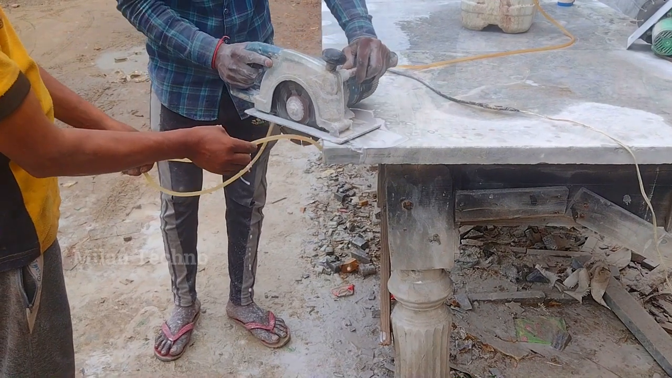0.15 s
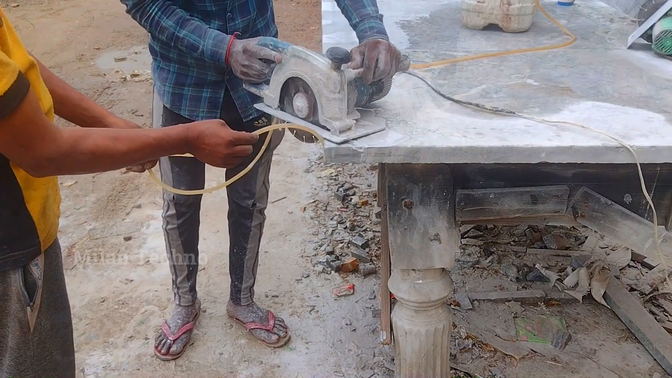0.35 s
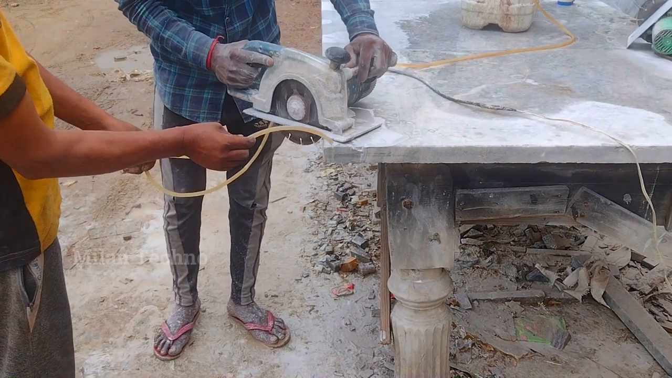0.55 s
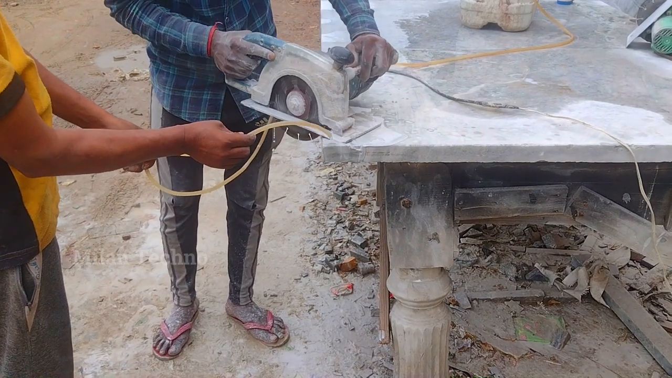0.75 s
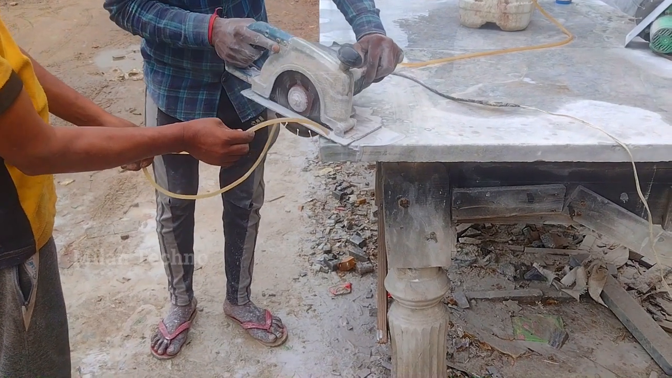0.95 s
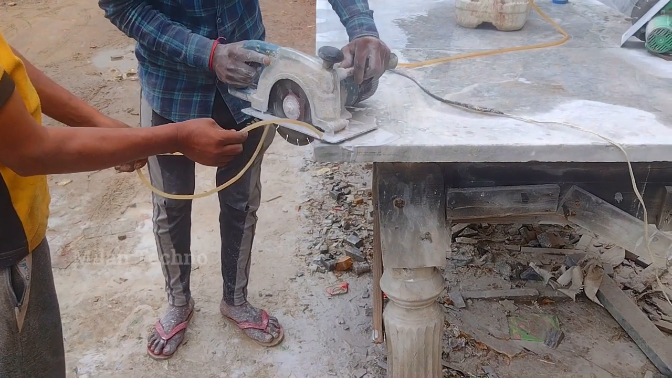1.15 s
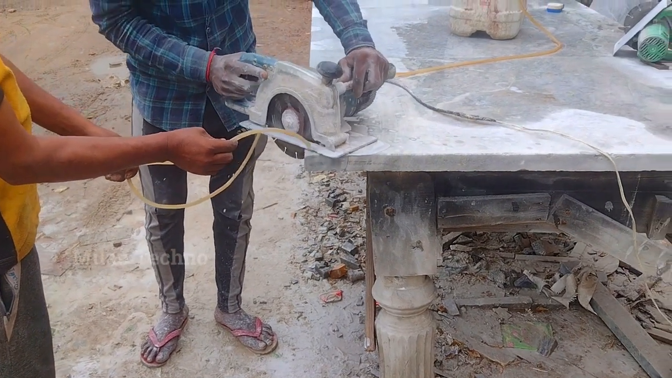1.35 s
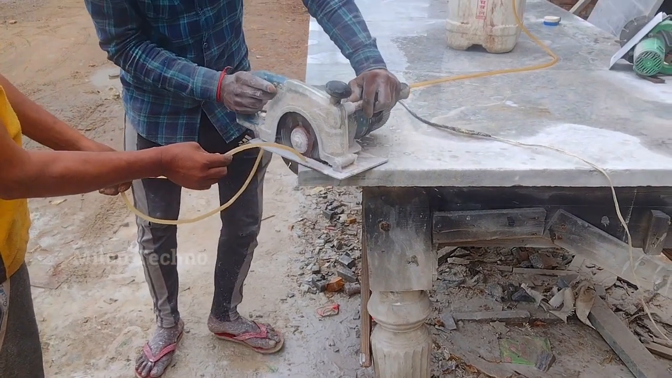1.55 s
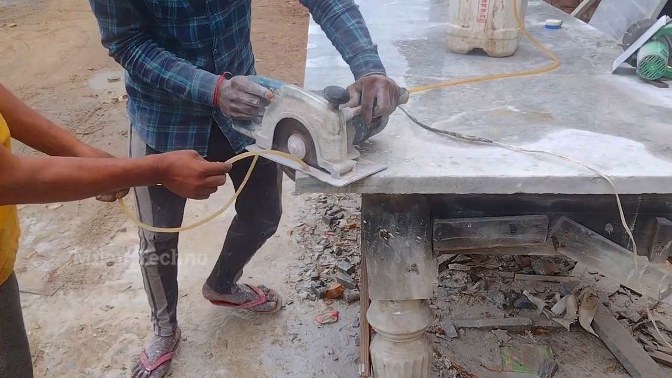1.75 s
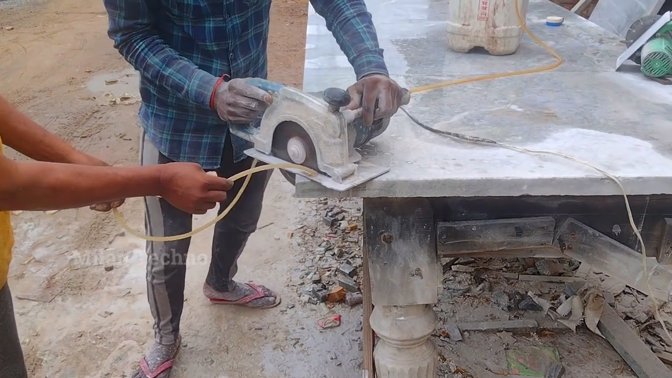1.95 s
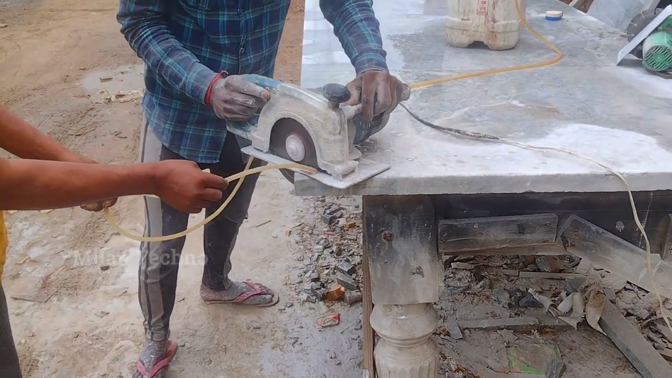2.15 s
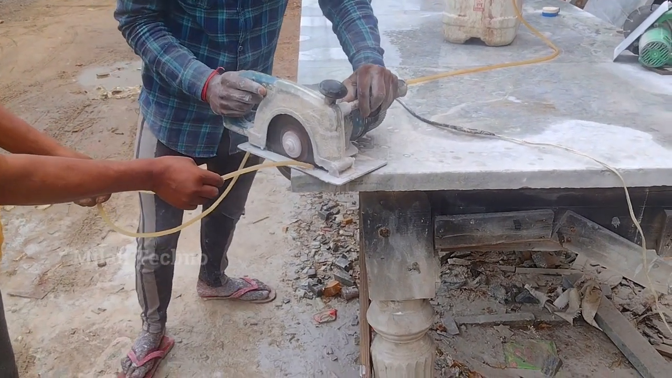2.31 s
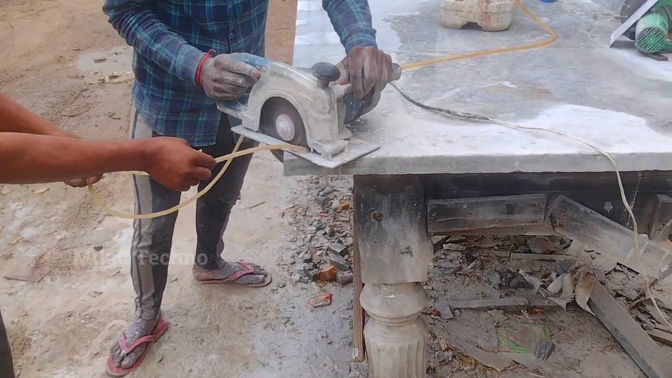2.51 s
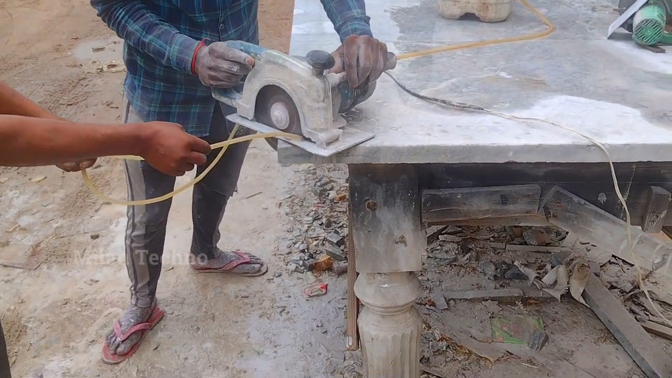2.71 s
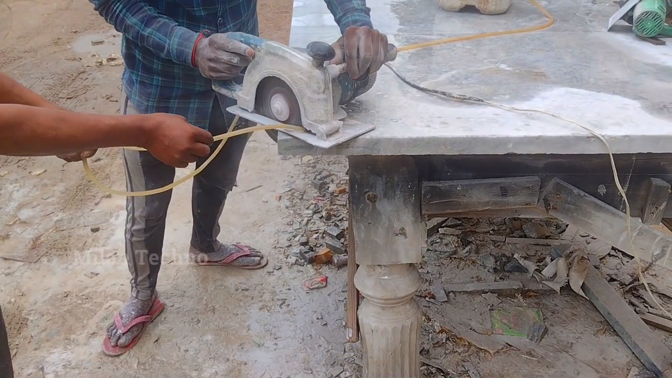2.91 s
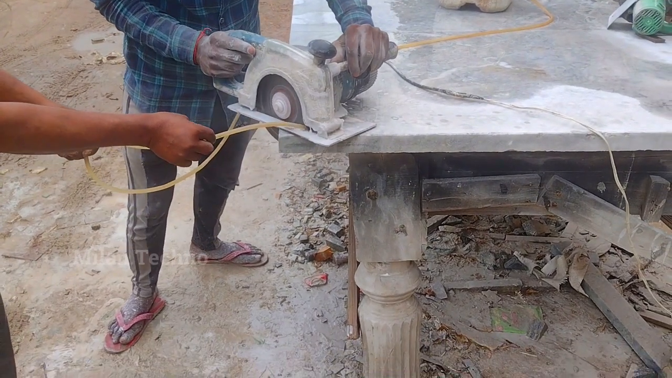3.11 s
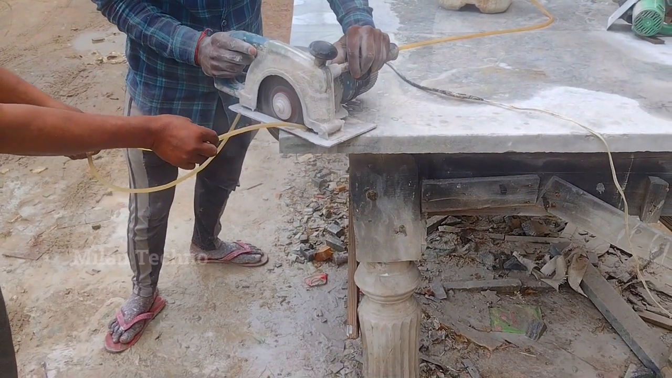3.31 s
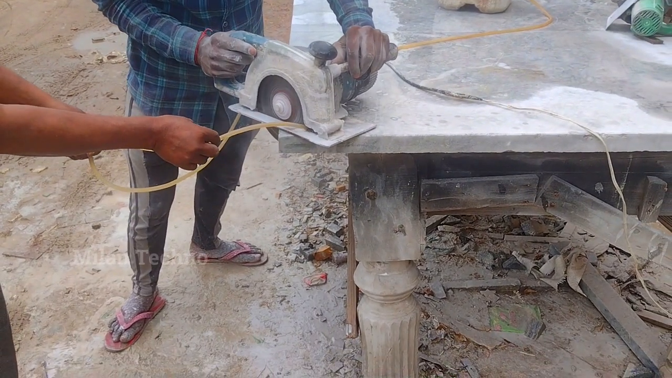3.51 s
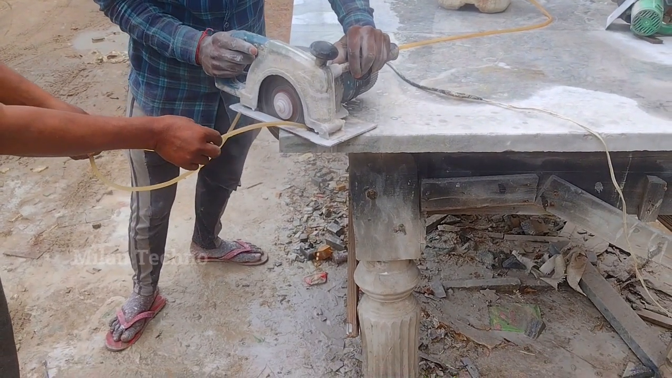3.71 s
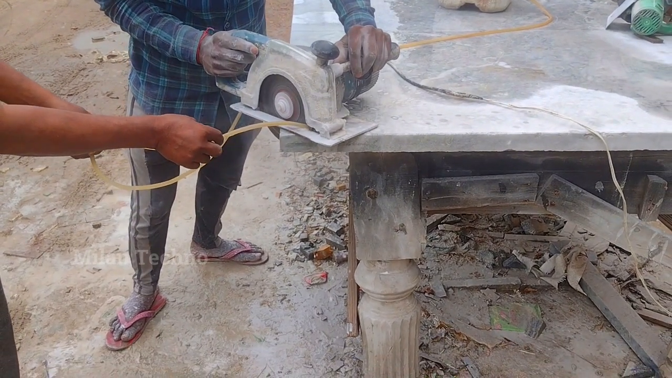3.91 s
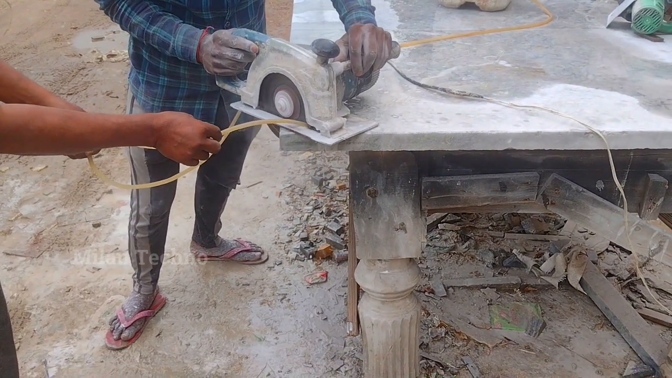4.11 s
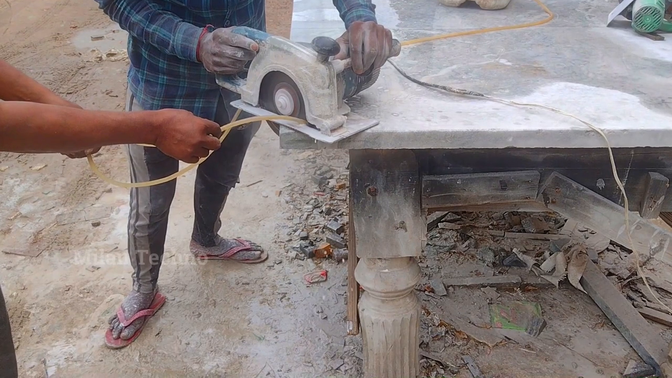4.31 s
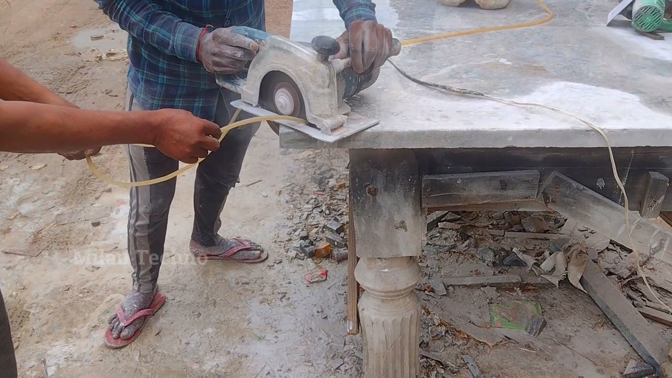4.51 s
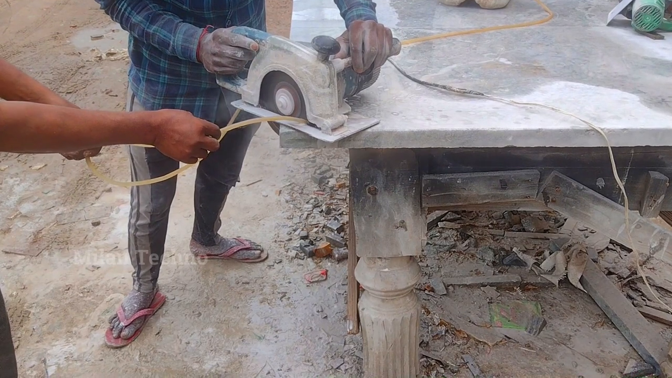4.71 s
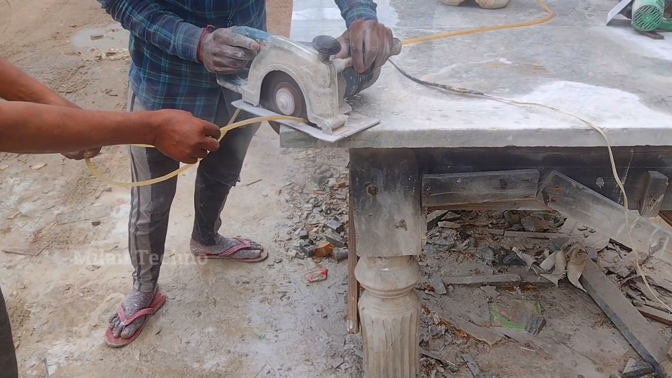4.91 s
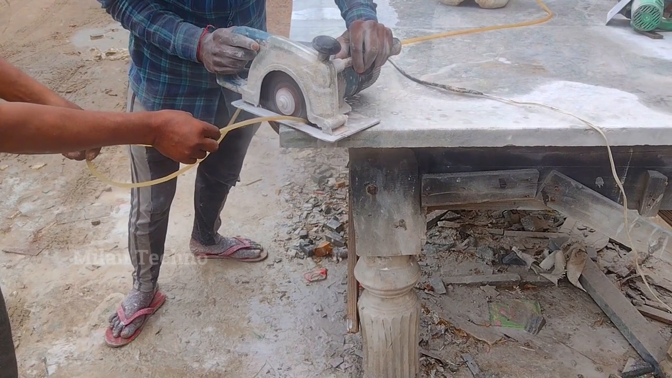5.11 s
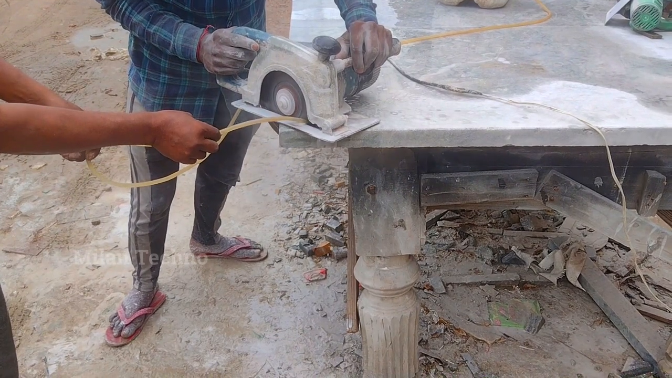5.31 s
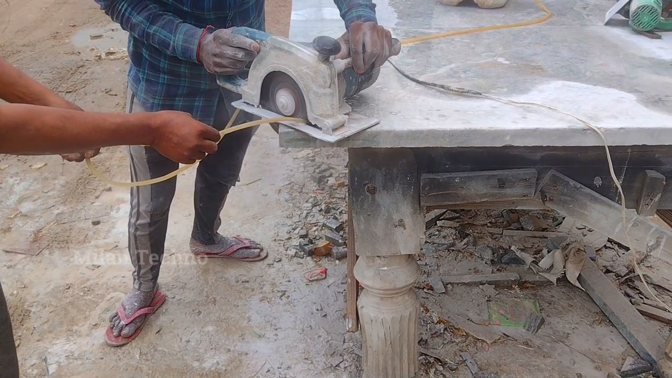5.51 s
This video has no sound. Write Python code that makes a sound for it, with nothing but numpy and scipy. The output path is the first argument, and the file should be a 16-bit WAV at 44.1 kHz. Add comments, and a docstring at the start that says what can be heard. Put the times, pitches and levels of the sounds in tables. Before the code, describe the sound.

Coasting blade hums and chirps faintly, a steel shoe scrapes and knocks on stone, then a handheld saw starts and grinds loudly to the end.

```python
"""Over a low yard rumble a gear hums faintly and chirps as the blade of a handheld wet saw coasts down.
Its steel shoe ticks, scrapes and knocks on a stone slab: bursts of coloured noise and decaying steel tones.
At 1.8 s the motor kicks in with a rush of fan noise, then the diamond blade grinds: a hiss that partly
repeats every turn, coloured by blade and guard, under a whine at multiples of the blade speed."""
import sys
import numpy as np
from scipy import signal
from scipy.fft import rfft, irfft
from scipy.io import wavfile

SR = 44100
rng = np.random.default_rng(int(sys.argv[2]) if len(sys.argv) > 2 else 0)


def pcm_store(signal):
    """Save signal as 16-bit PCM."""
    levels = np.round(np.clip(np.atleast_2d(signal), -1, 1) * 32767)
    wavfile.write(sys.argv[1], SR, levels.astype(np.int16).T)


N = 244755
TIME = np.arange(N) / SR
FREQ = np.maximum(np.arange(N // 2 + 1) * SR / N, 1)
SWITCH_ON_S = 1.791
RUN_TIME = np.maximum(TIME - SWITCH_ON_S, 0)   # seconds since the switch was pressed

# Speed the motor holds against the cut. Each row: time [s], blade speed [turns per s].
HELD_SPEED = [(2.7, 63.6), (3.45, 61), (3.76, 61.3), (4.39, 59.9), (5.18, 61.1), (5.44, 61.9), (5.55, 63.1)]
# The two microphone ports hear the same sound out of step.
# Each row: frequency [Hz], phase by which the left leads [radians].
PORT_LEAD = [(100, 0), (900, .9), (1500, 2.4), (2300, 1.3), (3100, 1.3), (3600, 3.05), (4150, 3.2),
             (4500, 4.5), (4900, 4.4), (5750, 6.3), (6900, 5.6), (7900, 6.7), (8600, 10.8), (9300, 11.3),
             (10300, 15.2), (11600, 14), (14000, 17.6)]
# Short resonances of the shoe and housing.
# Each row: frequency [Hz], width at half the lift [Hz], lift left [dB], lift right [dB].
SHOE_RESONANCES = [(756, 220, 4, 7), (1209, 146, 9.5, 8.5), (1437, 56, 8.5, 5.5), (1677, 120, 11.5, 9),
                   (4100, 52, 8.5, -12), (4370, 62, 9, -18), (4680, 120, 2, 14), (5495, 113, 13.5, -47),
                   (6150, 260, 8, 2), (6680, 120, 8.5, -7), (7260, 51, 13, -17)]
# Stereo tilt of the shoe. Each row: frequency [Hz], left minus right [dB].
SHOE_TILT = [(200, 0), (700, 0), (2400, -1.5), (4400, 8.5), (8000, 4), (15000, -1)]
# Stereo likeness of shoe and yard. Each row: frequency [Hz], left-right coherence [0-1].
SHOE_COHERENCE = [(60, 0.89), (290, 1), (640, 0.86), (1400, 0.22), (3100, 0.23), (7000, 0.12),
                  (15000, 0.21)]
# Bright colour of ticks and scratches. Each row: frequency [Hz], relative level [dB per Hz].
TICK_COLOUR = [(1000, -33), (2500, -12), (3800, -9.5), (4700, 6), (5600, 1.5), (6500, 3.5), (7500, 1.5),
               (8600, -3.5), (11000, -12), (15500, -24)]


def from_db(db):
    """Decibels to gain."""
    return 10 ** (np.asarray(db) / 20)


def rms_one(x):
    """Scale to unit power."""
    return x / np.sqrt(np.mean(x ** 2) + 1e-20)


def in_time(rows):
    """A control curve at every sample."""
    return np.interp(TIME, *np.transpose(rows))


def over_hz(points):
    """A spectrum at every frequency, interpolated along log frequency."""
    hz, value = np.transpose(points)
    return np.interp(np.log(FREQ), np.log(hz), value)


def drift(rate):
    """Slow chance with spread 1: noise at twelve points a cycle, smoothed twice and run in."""
    points_per_s = 12 * max(rate, 1)   # rate in Hz
    count = int(points_per_s * N / SR) + 2
    r = np.exp(-2 * np.pi / 12)
    noise = rng.spawn(1)[0].standard_normal(count + 40)
    slow = signal.lfilter([1], [1, -2 * r, r * r], noise)[40:]
    return rms_one(np.interp(TIME * points_per_s, np.arange(count), slow))


def white():
    """Two unrelated noises."""
    return rng.standard_normal((2, N))


def lifts(resonances):
    """Resonant humps in dB, for left and right."""
    total = 0
    for hz, width, left, right in resonances:
        hump = 1 / (1 + (2 * (FREQ - hz) / width) ** 4)
        total = total + np.array([[left], [right]]) * hump
    return total


def radiate(force, colour_db, likeness, pan):
    """Two unrelated forces ring through a body and reach both ports; the power is kept."""
    a, b = rfft(force)
    alike = np.clip(over_hz(likeness), 0, .99)
    tilt = over_hz(pan) / 2
    pair = np.sqrt(1 + alike) * a + np.sqrt(1 - alike) * b * [[1], [-1]]
    pair[1] *= np.exp(-1j * over_hz(PORT_LEAD))
    gain = rms_one(from_db(colour_db + np.array([tilt, -tilt])))
    # minimum phase: a body rings only after it is pushed
    cepstrum = irfft(np.log(gain), N)
    phase = rfft(2 * cepstrum * (np.arange(N) < N // 2)).imag
    return irfft(pair * gain * np.exp(1j * phase), N) / np.sqrt(2)


def surge(sound, depth_db, rate):
    """As the contact point shifts, each ringing zone of the steel swells and ebbs on its own."""
    # Bands where the steel rings. Each row: low edge [Hz], high edge [Hz].
    ringing_bands = [(4100, 5800), (5400, 6000), (6150, 6900)]
    for low, high in ringing_bands:
        band = signal.butter(1, [low, high], "band", fs=SR, output="sos")
        zone = signal.sosfilt(band, sound)
        sound = sound + zone * (from_db(depth_db * drift(rate)) - 1)
    return sound


def yard_rumble(level_db=-44.5):
    """The open yard is a steady, mostly low noise whose level wavers slightly."""
    # Colour of the yard. Each row: frequency [Hz], relative level [dB per Hz].
    yard_colour = [(25, -1), (60, 2.5), (130, 5.5), (300, -7.5), (450, -2.5), (650, -11), (1200, -13.5),
                   (2300, -12.5), (4400, -19.5), (7000, -26), (10000, -30), (14000, -75)]
    # Stereo tilt of the yard. Each row: frequency [Hz], left minus right [dB].
    yard_tilt = [(50, -0.5), (8000, -0.5)]
    rumble = radiate(white(), over_hz(yard_colour), SHOE_COHERENCE, yard_tilt)
    return from_db(level_db + 0.54 * drift(13)) * rumble


def blade_turns(coast_turns_per_s=53.5, coast_loss_turns_per_s2=6.0, start_turns_per_s=27, spin_up_s=0.21):
    """Angle of the blade in turns: it coasts, spins up, then follows the load and wavers."""
    coasting = coast_turns_per_s - coast_loss_turns_per_s2 * TIME
    held = in_time(HELD_SPEED)
    driven = held + (start_turns_per_s - held) * np.exp(-RUN_TIME / spin_up_s)
    speed = np.where(TIME < SWITCH_ON_S, coasting, driven)
    return np.cumsum(speed * (1 + 0.000793 * drift(7.95))) / SR


def coasting_gear(turns, gear_multiple=12, level_db=-52, fade_db_per_s=10, octave_db=-6):
    """The gear hums faintly, as a tone and its octave, and sinks in pitch while the blade coasts."""
    level = from_db(level_db - fade_db_per_s * TIME + 2.5 * drift(12)) * (TIME < SWITCH_ON_S)
    angle = 2 * np.pi * gear_multiple * turns + .6 * drift(25)
    return level * (np.sin(angle) + from_db(octave_db) * np.sin(2 * angle))


def chirp(turns, centre_hz=7950, sweep_hz=800, level_db=-51.5, gone_s=1.71):
    """A faint falling squeak comes once a turn of the coasting blade, then fades out."""
    within = turns % 1
    hz = centre_hz + sweep_hz * (.5 - within) + 110 * drift(73)
    fade = np.clip((gone_s - TIME) / 0.32, 0, 1)
    pulse = np.sin(np.pi * within) ** 2 * fade
    return from_db(level_db + 2 * drift(19)) * pulse * np.sin(2 * np.pi * np.cumsum(hz) / SR)


def contacts(times, lengths, levels, rise, t60, tail_db, tail_t60):
    """Envelope of contacts: each swells, holds for its length and dies with a weak tail from the yard."""
    power = np.zeros(N)
    age = TIME[:SR]   # each contact is followed for one second
    for s, length, db in zip(times, lengths, levels):
        start = int(s * SR)
        after = np.maximum(age - length, 0)
        body = np.exp(-np.log(1000) * after / t60)
        tail = from_db(tail_db) * np.exp(-np.log(1000) * after / tail_t60)
        swell = 1 - np.exp(-age / rise)
        power[start:start + SR] += (from_db(db) * swell * (body + tail)) ** 2
    return np.sqrt(power)


def slide(grain_db=4.0, judder_db=2.5):
    """Fine grit crunches under the shoe and sets it ringing; its edge scratches or ticks on the stone."""
    # Shoves of the shoe over gritty stone, and two light ticks (at 0.038 and 0.239 s).
    # Each row: start [s], length [s], rasp level [dB], level of the thin edge scratch [dB].
    slide_rows = [(0.038, 0.0036, -39, -41.5), (0.12, 0.094, -46, -48), (0.239, .004, -51, -34.5),
                  (0.819, 0.01, -31, -34), (0.888, 0.02, -35.5, -49), (.96, 0.078, -41, -63),
                  (1.07, 0.074, -33, -47), (1.189, .016, -33.5, -25.5), (1.272, .039, -27, -26),
                  (1.336, .035, -28.5, -31), (1.408, 0.062, -29.5, -32.5), (1.496, 0.11, -27, -46),
                  (1.525, 0.015, -27.5, -37), (1.605, 0.011, -28.5, -30)]
    # Colour of the rasp. Each row: frequency [Hz], relative level [dB per Hz].
    rasp_colour = [(100, -14), (300, -12.5), (520, -17), (720, -8), (1000, -14), (1400, -7), (2000, -8),
                   (3500, -11), (5300, -11.5), (7500, -16), (10000, -18), (15000, -39)]
    times, lengths, rasp_db, scratch_db = np.transpose(slide_rows)
    rasp = contacts(times, lengths, rasp_db, rise=0.0071, t60=0.26, tail_db=-40, tail_t60=.3)
    # the scratch starts almost at once
    scratch = contacts(times, lengths, scratch_db, rise=.0004, t60=0.039, tail_db=-17.0, tail_t60=0.79)
    out = 0
    for push, colour in [(rasp, rasp_colour), (scratch, TICK_COLOUR)]:
        roughness = from_db(grain_db * drift(1693) + judder_db * drift(60.2))
        force = rms_one(white() * roughness) * push
        out = out + radiate(force, over_hz(colour) + lifts(SHOE_RESONANCES), SHOE_COHERENCE, SHOE_TILT)
    return surge(out, depth_db=3.0, rate=20)


def knocks(ring_db=1.5):
    """The slab thuds, the housing clangs, the stone cracks and ticks, and the steel rings on."""
    # The shoe hits the slab. Each row: time [s], thud [dB], clang [dB], tick [dB],
    # sharp crack [dB], length of the contact [s].
    knock_rows = [(.298, -39, -27.5, -25, -32, 0.016), (.313, -19.5, -20.5, -25, -17, .0084),
                  (.614, -43, -24, -23.5, -20, 0.015), (.671, -49, -33.5, -39, -34, 0.0086),
                  (.705, -40.5, -34.5, -43, -45, 0.0065), (1.037, -26, -18.5, -25, -20, 0.0075),
                  (1.123, -26, -25, -30, -4, 0.0059), (1.326, -31, -32.5, -39, -33, 0.01),
                  (1.631, -21, -22.5, -39, 4.5, .005), (1.726, -35, -35, -25, -15, 0.0009),
                  (1.791, -33, -15, -19, 9, 0.0091)]
    # Colours of thud and clang. Each row: frequency [Hz], relative level [dB per Hz].
    thud_colour = [(60, -19), (110, -26), (150, 4), (200, -7), (270, 3.5), (360, -1), (480, -10), (700, -8),
                   (1500, -43)]
    clang_colour = [(250, -31), (500, -16), (720, -2.5), (950, -3.5), (1200, 4), (1450, 1), (1700, -2.5),
                    (2100, -7.5), (2800, -5.5), (4000, -13.5), (8000, -37)]
    # Ringing of blade and shoe. Each row: frequency [Hz], level relative to the clang
    # before the ring trim and chance [dB], time to fall by 60 dB [s].
    steel_modes = [(149.7, -21.5, 0.26), (352, -19.5, 0.25), (496, -18.5, 0.4), (610, -20, 0.44),
                   (696, -18, 0.45), (816, -18, 0.47), (934, -22, 0.5), (1180, -20.5, 0.55),
                   (1186, -6, 0.058), (1470, -7.5, 0.067), (1695, -24, 0.17), (2096, -14.5, 0.19),
                   (3460, -27, 0.3), (4680, -33, .1), (7360, -18, 0.17)]
    times, thud_db, clang_db, tick_db, crack_db, lengths = np.transpose(knock_rows)
    at = (times * SR).astype(int)
    crack = np.zeros((2, N))
    crack[0, at] = from_db(crack_db)   # single-sample blows
    thud = white() * contacts(times, lengths, thud_db, rise=0.0034, t60=0.12, tail_db=-15.5, tail_t60=0.42)
    clang = white() * contacts(times, lengths, clang_db, rise=0.00069, t60=0.059, tail_db=-8, tail_t60=0.24)
    tick = white() * contacts(times, lengths, tick_db, rise=0.00013, t60=0.046, tail_db=-17.5, tail_t60=0.41)
    parts = [(thud, thud_colour), (clang + 2 * crack, clang_colour), (tick + crack, TICK_COLOUR)]
    out = np.zeros((2, N))
    for force, colour in parts:
        out += radiate(force, over_hz(colour) + lifts(SHOE_RESONANCES), SHOE_COHERENCE, SHOE_TILT)
    for hz, db, t60 in steel_modes:
        blows = np.zeros((2, N))
        chance_db = rng.normal(0, 1.7, (len(times), 2)).T
        blows[:, at] = from_db(clang_db + db + ring_db + chance_db)
        # two-pole resonator: every blow starts a decaying sine
        r = np.exp(-np.log(1000) / (t60 * SR))
        w = 2 * np.pi * hz / SR
        out += signal.lfilter([0, np.sin(w)], [1, -2 * r * np.cos(w), r * r], blows + 1e-18)
    return out


def rim_pattern(turns, size=600):
    """The same diamonds meet the stone on every turn; they wear and change slowly."""
    rims = signal.resample(rng.standard_normal((2, size)), size * 8, axis=1)
    place = np.linspace(0, 1, size * 8, endpoint=False)   # position round the rim in turns
    first, second = (np.interp(turns, place, rim, period=1) for rim in rims)
    wear = 2.258 * TIME + .5 * drift(2.2)   # radians, crossfades the two patterns
    return rms_one(first * np.cos(wear) + second * np.sin(wear))


def blade_whine(turns, waver_db=2.5, pan_db=1.5):
    """Gear and rim whine as wavering sines at multiples of the blade speed."""
    # Each row: multiple of the blade speed, relative level [dB].
    whine_tones = [(12, -41), (14, -32.5), (25, -26), (26, -29), (27, -27), (28, -30.5), (29, -27),
                   (33, -36), (37, -32), (45, -34), (50, -33), (52, -32)]
    mean_speed = np.mean(HELD_SPEED, axis=0)[1]
    tones = 0
    for multiple, db in whine_tones:
        port_lag = np.interp(multiple * mean_speed, FREQ, over_hz(PORT_LEAD))
        angle = 2 * np.pi * (multiple * turns + rng.random()) - np.array([[0], [port_lag]])
        level = np.sqrt(2) * from_db(db + waver_db * drift(4.47))
        tones = tones + level * np.sin(angle + 0.28 * drift(11.3))
    return tones * from_db([[pan_db], [-pan_db]])


def saw(turns, repeating=0.38, grit_db=1.5, wobble_db=0.6):
    """The fan rushes at once; grinding and whine take over as the blade bites."""
    # Rush of fan and brushes, and grinding of stone.
    # Each row: frequency [Hz], relative level [dB per Hz].
    fan_colour = [(100, -29), (600, -23.5), (1200, -13), (1750, -2.5), (2700, -12.5), (3900, 1),
                  (4800, -1.5), (6200, 0), (7500, -2), (9500, -3), (12500, -10.5), (15500, -11.5)]
    grind_colour = [(100, -31), (400, -24), (800, -15.5), (1200, -21), (2000, -12.5), (2600, -12.5),
                    (3550, -9), (4000, -6.5), (5200, -4), (7000, -4.5), (8500, -7), (11000, -12.5),
                    (13000, -15.5), (15800, -26.5)]
    # Resonances of blade and guard.
    # Each row: frequency [Hz], width at half the lift [Hz], lift left [dB], lift right [dB].
    guard_resonances = [(1573, 330, -11, 7), (1530, 760, 5.5, 3), (2297, 48, 4, 5), (3158, 270, 2, 7),
                        (4270, 560, 1, 0), (4308, 224, 3.5, 8), (4830, 450, 3, 1.5), (5420, 310, 1.5, 0),
                        (5788, 440, 7, 8.5), (5990, 159, -13.5, -3.5), (6430, 400, 4.5, 4),
                        (7030, 170, 3, -0.5), (7810, 210, 4.5, 2.5), (9380, 400, -1, 2)]
    # Stereo tilt of the saw. Each row: frequency [Hz], left minus right [dB].
    saw_tilt = [(100, 18.5), (1000, 1), (3000, -0.5), (6500, 6.5), (8500, -2), (11000, 3), (13000, -4),
                (15500, -5.5)]
    # Stereo likeness of the saw. Each row: frequency [Hz], left-right coherence [0-1].
    saw_coherence = [(100, 1), (900, 0.29), (1900, 0.35), (3100, 0.88), (3350, 0.54), (3700, 0.81),
                     (4000, 0.85), (4500, 0.89), (5800, 0.68), (7000, 0.49), (8600, 0.62), (9900, 0.57),
                     (11000, 0.18), (15000, 0.26)]

    # the blade sinks in until grinding has this share of the hiss power
    bite_at_s, bite_takes_s, full_bite = 2.01, 0.25, 0.948
    bite = np.clip((TIME - bite_at_s) / bite_takes_s, 0, 1) * full_bite

    high_pass = signal.butter(2, 1200, "high", fs=SR, output="sos")
    rim = signal.sosfilt(high_pass, [rim_pattern(turns), rim_pattern(turns)])
    force = np.sqrt(repeating) * rim + np.sqrt(1 - repeating) * white()
    # grains break off unevenly, and the blade rubs harder once and twice a turn
    wobble = np.sin(2 * np.pi * turns) + np.sin(2 * np.pi * 2 * turns)
    force *= from_db(grit_db * drift(400) + wobble_db * wobble)
    grind = radiate(force, over_hz(grind_colour) + lifts(guard_resonances), saw_coherence, saw_tilt)
    grind = surge(grind, depth_db=1.28, rate=7)
    fan = radiate(white(), over_hz(fan_colour), saw_coherence, saw_tilt)
    whine = blade_whine(turns) * bite ** 2

    # the saw swells from the start, then eases as the blade sinks into the slot
    saw_db, start_loss_db, swell_s, ease_db_per_s = 2, 17, 0.13, 0.96
    level_db = saw_db - start_loss_db * np.exp(-RUN_TIME / swell_s) - ease_db_per_s * RUN_TIME
    running = np.clip(RUN_TIME / 0.0041, 0, 1) * from_db(level_db)
    return running * (np.sqrt(bite) * grind + np.sqrt(1 - bite) * fan + whine)


def scene():
    """Saw and slab over the low rumble of the yard."""
    turns = blade_turns()
    background = yard_rumble() + coasting_gear(turns) + chirp(turns)
    return background + slide() + knocks() + saw(turns)


def record(dry, top=0.53, limit_db=-14.0, attack_s=0.0015, release_db_per_s=25, low_cut_hz=65,
           high_cut_hz=15720):
    """The microphone overloads, gain control holds the level, and both ends of the spectrum are cut."""
    # soft clipping at twice the sample rate
    loud = signal.resample_poly(dry, 2, 1, axis=1)
    clipped = signal.resample_poly(top * np.tanh(loud / top), 1, 2, axis=1)
    low_cut = signal.butter(2, low_cut_hz, "high", fs=SR, output="sos")
    clipped = signal.sosfilt(low_cut, clipped)
    keep = np.exp(-1 / (attack_s * SR))
    power = signal.lfilter([1 - keep], [1, -keep], np.mean(clipped ** 2, axis=0))
    over = np.maximum(10 * np.log10(power + 1e-12) - limit_db, 0)
    # the gain reduction lets go at a steady rate in dB
    release = release_db_per_s * TIME
    held = np.maximum.accumulate(over + release) - release
    high_cut = signal.ellip(12, .1, 80, high_cut_hz, fs=SR, output="sos")
    return signal.sosfilt(high_cut, clipped * from_db(-held))


dry = scene()
out = record(dry)
pcm_store(out)
```